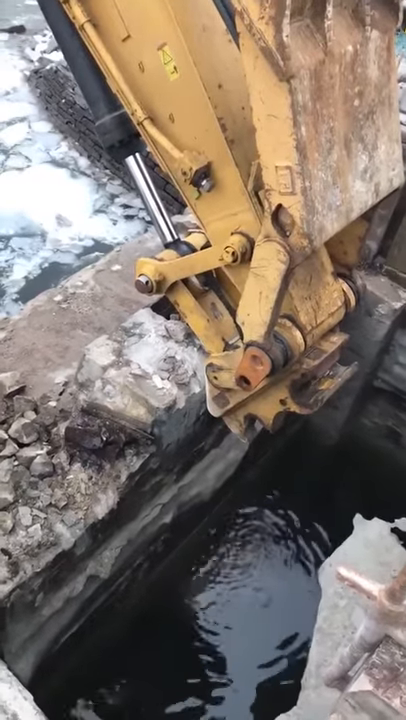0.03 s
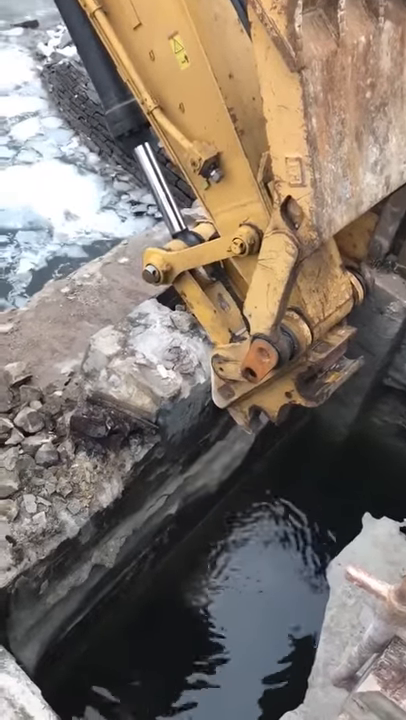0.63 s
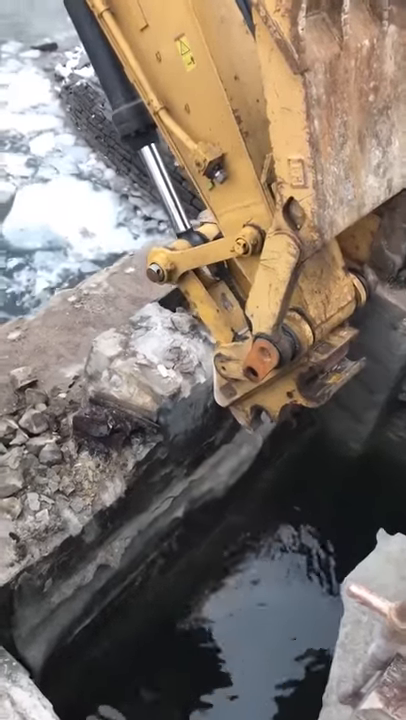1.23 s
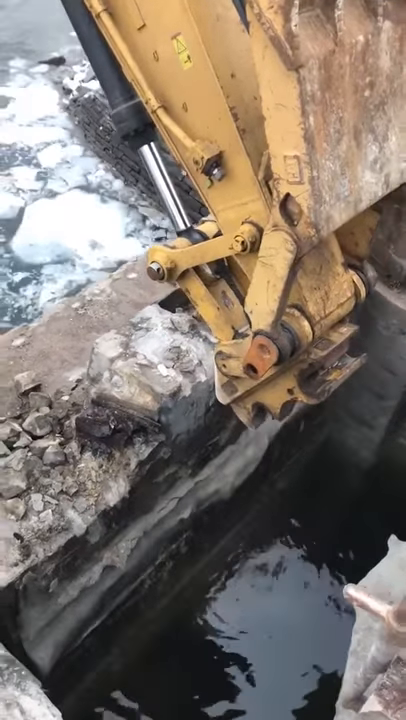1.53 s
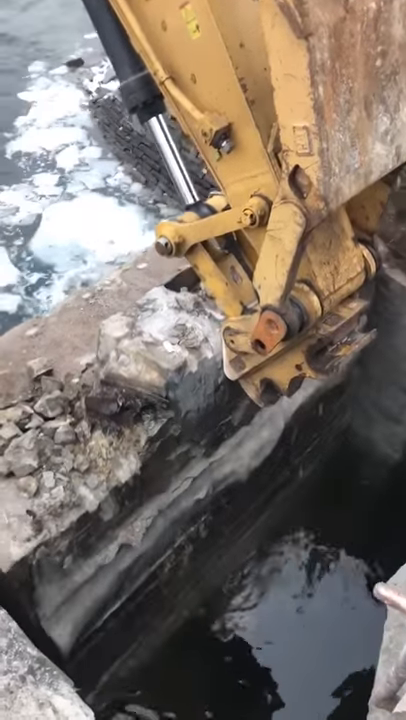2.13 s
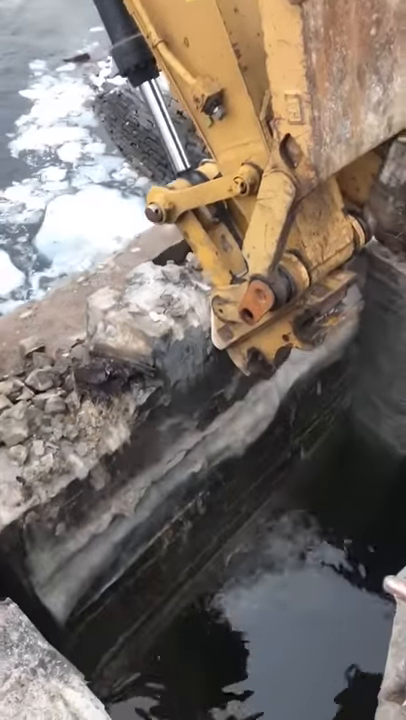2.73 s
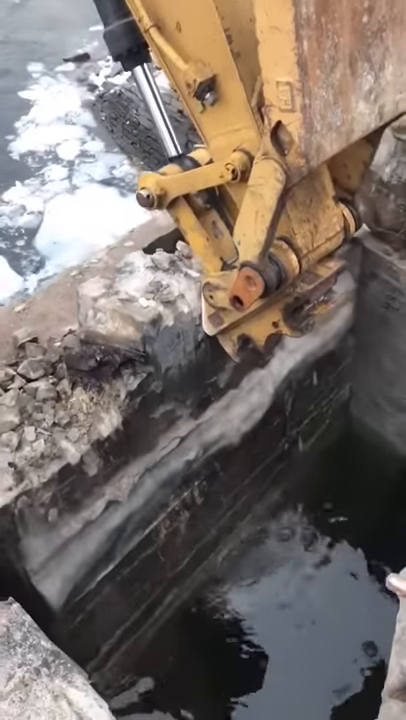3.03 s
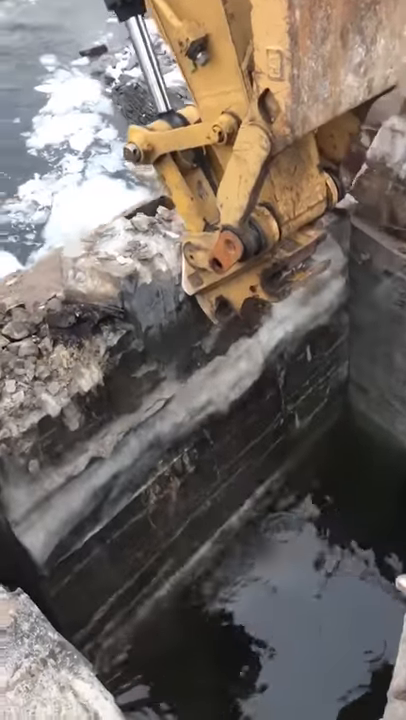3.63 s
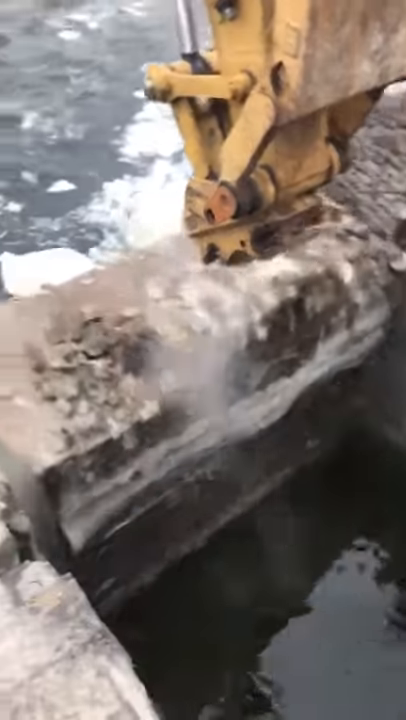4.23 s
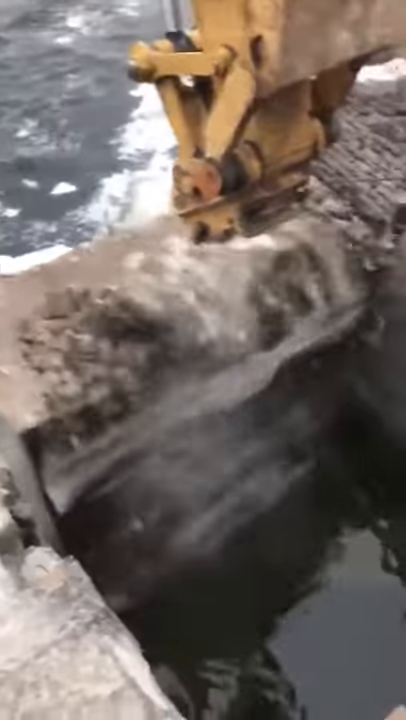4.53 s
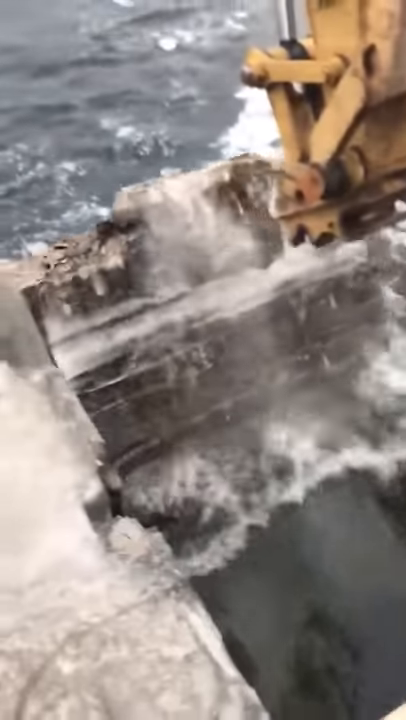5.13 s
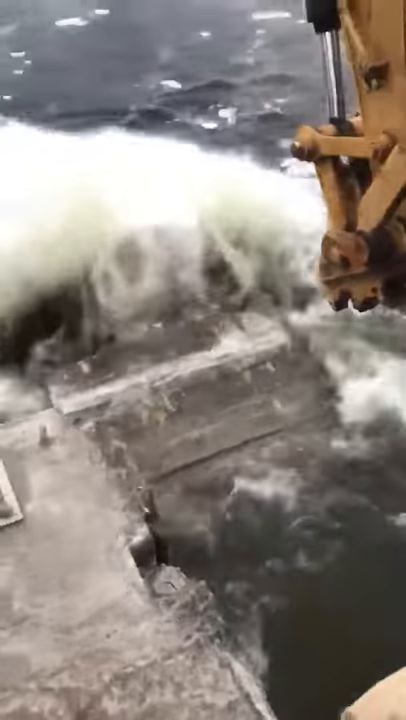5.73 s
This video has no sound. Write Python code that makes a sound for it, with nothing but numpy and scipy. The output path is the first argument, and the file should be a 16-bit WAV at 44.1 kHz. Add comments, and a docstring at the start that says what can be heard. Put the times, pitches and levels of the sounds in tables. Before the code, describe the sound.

Wind buffets a small outdoor microphone throughout, with low rumbling, ragged flutter and irregular thumps. Under it an excavator's diesel drones steadily, with a thin hydraulic whine that swells and fades. A faint snap and trickle of grit come at about 1.5 seconds. At 2.5 seconds concrete breaks with a sharp cluster of cracks, briefly ringing the steel bucket teeth. A small snap and scrape follow at 3.6 seconds, then more cracks around 3.9 and 4.1. From 3.8 to 4.9 seconds the slab crunches and grinds in short bursts, shedding grit and rubble, and the bucket gives two brief groans near 4.5 and 4.8. From 5 seconds the slab drops into water: moderate splashing, hissing spray and bubbling churn build toward the end, near 6 seconds, as the gusts rise again. The cracks and splashes have a short echo off concrete walls.

```python
"""An excavator levers a concrete wall over on a windy waterfront. Brittle fractures snap and ring the
steel bucket teeth, grit trickles out, the slab grinds on its footing, and stick-slip friction makes the
bucket groan. The slab drops and water rushes up around it with spray and ringing bubbles.
The diesel's periodic firing drones under the whine of the hydraulic pump, and all the while
turbulent gusts buffet the small microphone."""
import sys
import numpy as np
from scipy import signal
from scipy.fft import rfft, irfft, next_fast_len
from scipy.io import wavfile
from scipy.ndimage import uniform_filter1d

SR = 44100
rng = np.random.default_rng(int(sys.argv[2]) if len(sys.argv) > 2 else 0)


def transcribe(u):
    """Save the signal u as a 16-bit wav file named by the first command-line argument.

    u: samples, shape (n,) or (channels, n), limited to [-1, 1]; the rate is SR.
    q: integer samples, one column per channel.
    """
    v = np.clip(np.atleast_2d(u).T, -1, 1)
    q = np.round(v * 32767).astype(np.int16)
    wavfile.write(sys.argv[1], SR, q)


N = 263277
TIME = np.arange(N) / SR

# Levels in the tables are relative: each source applies its own gain.
# The breeze between gusts. Each row: time in seconds, rumble level in dB, flutter level in dB.
BREEZE = [(0, -18.5, -24), (.68, -19.5, -25.5), (1.3, -21, -22), (2.3, -21.5, -29), (2.48, -19.5, -21),
          (3.1, -18.5, -35), (4.3, -26.5, -29), (4.97, -29.5, -44), (5.56, -26, -37.5), (5.75, -17, -19),
          (5.97, -18.5, -21)]
# Gusts. Each row: start in seconds, length in seconds, rumble level in dB, flutter level in dB.
GUSTS = [(0.01, 0.17, -19, -25), (0.286, 0.021, -15, -21), (0.487, 0.064, -17, -19),
         (0.955, 0.063, -21.5, -18), (1.097, 0.034, -15, -17), (1.211, 0.058, -25.5, -16),
         (1.65, 0.26, -19, -18.5), (1.93, 0.17, -36, -18.5), (2.17, 0.043, -19, -40),
         (2.664, 0.066, -16, -22), (2.797, 0.056, -14.5, -20.5), (2.966, 0.066, -13.5, -15),
         (3.202, 0.086, -16.5, -21.5), (3.366, 0.31, -17.5, -13), (3.788, 0.1, -22, -15.5),
         (4.095, 0.041, -15, -20.5), (4.218, 0.04, -19, -39), (4.422, 0.095, -13.5, -27),
         (4.583, 0.13, -20, -42), (5.097, 0.1, -20.5, -35), (5.214, 0.11, -18, -21),
         (5.698, 0.13, -23.5, -19.5), (5.887, 0.072, -16, -13.5)]
# The strongest eddies at the microphone port. Each row: start in seconds, swing level in dB,
# pitch in Hz, duration in cycles, flutter level in dB, flutter rise time in seconds.
STRONG_EDDIES = [(0.302, 3, 151, 8, -13, 0.004), (0.999, -6, 194, 6.5, -10, .01),
                 (1.048, 10, 200, 6.1, -24, 0.0041), (1.095, -1, 171, 8.4, -10, .005),
                 (1.183, 8.5, 103, 5.4, -24, 0.0067), (1.194, 1, 131, 3.9, -13, .004),
                 (1.211, -8, 200, 4.4, -10, .004), (1.235, -8, 240, 5.9, -13.5, 0.0083),
                 (1.357, 2.5, 149, 4.1, -16, 0.0048), (1.476, 3, 142, 4.8, -24, 0.0055),
                 (1.528, 13.5, 72, 4.7, -14, .005), (1.566, 2, 170, 4.7, -11, .009),
                 (1.583, 5.5, 111, 6.9, -15.5, 0.0051), (1.617, -13, 91, 6.4, -16.5, .004),
                 (1.734, 1.5, 141, 8, -15, 0.013), (1.773, 6, 220, 8.5, -15.5, 0.0065),
                 (1.961, 0.5, 178, 8.6, -18, 0.0048), (2.002, -7, 122, 6, -11.5, .008),
                 (2.054, 1, 95, 10, -11.5, 0.0086), (2.079, -7, 147, 6.7, -12.5, .007),
                 (2.147, 3, 81, 10, -13.5, 0.0037), (2.172, 5.5, 121, 7.3, -16, 0.0054),
                 (2.314, 1.5, 110, 5, -25, .006), (2.637, 0, 129, 6.7, -5.5, 0.0066),
                 (2.653, 5, 85, 7.1, -8.5, .006), (2.689, 4, 69, 6.6, -13, 0.0044),
                 (2.699, 7.5, 112, 8.2, -24, .006), (2.768, 5, 249, 8.1, -15.5, .005),
                 (2.778, 8, 191, 4.8, -9, .006), (2.794, 3, 120, 6.2, -21, .006),
                 (2.883, -1.5, 200, 6, -11, .007), (2.892, 8.5, 104, 5.9, -18, 0.0056),
                 (2.914, -3, 132, 5.2, -7.5, .006), (2.927, 8, 82, 5, -7.5, 0.0024),
                 (2.958, 8, 69.4, 5.5, -16, .006), (2.984, 2, 202, 8, -11, 0.0087),
                 (3.0, 4, 203, 7.6, -7.5, 0.004), (3.147, 2.5, 185, 10, -23, 0.0066),
                 (3.172, 4.5, 75, 4.5, -38, .006), (3.256, 1, 150, 5.6, -10.5, 0.0074),
                 (3.358, -12, 113, 6, -10.5, 0.0024), (3.413, -3, 162, 6.3, -12, 0.004),
                 (3.437, 0, 150, 5.6, -26, .005), (3.458, 3.5, 79.3, 9.5, -16, 0.0033),
                 (3.558, 8, 155, 5.2, -10, 0.0068), (3.581, 4.5, 170, 4.2, -11, 0.0063),
                 (3.707, -3, 147.7, 9.6, -15.5, 0.0052), (3.798, 4.5, 105, 8.8, -16, 0.0027),
                 (3.838, -2, 67, 5, -12.5, 0.0088), (3.856, 3.5, 110, 4.5, -17, 0.01),
                 (4.07, -2, 110, 5.4, -16, .003), (4.092, 7.5, 81, 7, -14.5, 0.0057),
                 (4.243, 3, 109, 6.7, -24, .006), (4.422, -1, 121, 6, -7, 0.0082),
                 (4.46, 8, 123, 11, -12, .005), (4.487, 7, 115, 7, -15, 0.0058),
                 (4.598, 6.5, 85, 8.1, -12, 0.0053), (4.687, -8, 129.8, 6.1, -17, .005),
                 (4.844, 3, 69, 5.6, -32, 0.0069), (5.034, 5, 70, 2.7, -26, .006),
                 (5.145, 3, 64.4, 9.6, -21, 0.0069), (5.214, 1.5, 90, 5.6, -17, 0.0036),
                 (5.253, 14.5, 68.7, 4, -10, 0.0037), (5.289, 7.5, 90, 6, -10, 0.0056),
                 (5.343, 4.5, 64.7, 5.5, -34, .006), (5.686, -3, 152, 6.5, -10.5, 0.0051),
                 (5.746, -19, 112.7, 5, -10, .005), (5.811, 0, 70, 5.5, -11, 0.0055),
                 (5.88, 2, 268, 9, -14, 0.0035), (5.935, -9, 200, 8.2, -11, 0.0079)]
# The diesel. Each row: time in seconds, firing rate in Hz, level in dB.
ENGINE_RUN = [(0, 89, -26.5), (1.2, 79.4, -27), (2.3, 87, -25), (2.95, 79, -26.5), (3.1, 81, -30),
              (3.45, 81, -27.5), (3.72, 80, -32), (4.25, 87, -25), (4.7, 79, -28.5), (5.97, 140, -36)]
# Engine harmonics. Each row: multiple of the firing rate, level in dB.
ENGINE_ORDERS = [(1, 0), (2, -10.5), (3, -17.5), (4, -11), (15, -29), (28, -24)]
# The hydraulic pump as its load comes and goes. Each row: time in seconds, level in dB, pitch in Hz.
PUMP_WHINE = [(0, -38.5, 540), (.55, -38, 537), (.9, -29.5, 538), (1.3, -36, 541), (1.65, -39, 540),
              (2.0, -32, 540), (2.2, -36, 535), (2.5, -30.5, 538), (3.1, -39, 536), (4.0, -41, 544),
              (4.2, -33, 550), (4.6, -48, 545), (5.97, -50, 540)]
# The bucket skidding off the slab. Each row: start in seconds, length in seconds, level in dB,
# initial slip rate in Hz, fractional unevenness of that rate.
SKIDS = [(4.542, 0.063, -24.5, 415, 0.1365), (4.801, 0.14, -27.5, 388, 0.0352)]
# The slab crushing its footing. Each row: start in seconds, length in seconds, level in dB, cutoff in Hz.
CRUNCHES = [(3.768, 0.062, -26, 2420), (3.825, 0.093, -26.5, 2780), (4.07, 0.08, -27, 5500),
            (4.133, 0.046, -31, 3470), (4.267, 0.039, -28.5, 2500), (4.345, 0.14, -25, 1730),
            (4.421, 0.03, -26.5, 3160), (4.501, 0.083, -27, 4540), (4.818, 0.058, -28.5, 2500)]
# Concrete snapping against the teeth. Each row: start in seconds, level in dB,
# share from 0 to 1 that rings the steel, pitch of the flying shard in Hz.
CRACKS = [(1.495, -19.5, 0.35, 8700), (2.42, -20, 0.3, 8600), (2.438, -16.5, 0.4, 8500),
          (2.4928, 1, 0.22, 5950), (2.497, -7.5, 0.26, 6800), (2.5023, -2, 0.25, 8200),
          (2.515, -13, 0.5, 6600), (3.573, -15, 0.2, 7300), (3.855, -14, 0.5, 8300),
          (3.8606, -9.5, 0.07, 6250), (3.866, -9, 0.33, 4180), (4.0018, -19, 0.13, 6120),
          (4.075, -13, 0.36, 6200), (4.2708, -24, 0.4, 5850)]

# Noisy events. Each row: start in seconds, length in seconds, level in dB.
SPLASHES = [(5.09, 0.15, -30.5), (5.188, 0.044, -34.5), (5.408, 0.0098, -43), (5.592, 0.72, -37),
            (5.853, .12, -39)]   # the plunge, its spout, a slap, the returning wave, its breaking crest
SPRAY_SHEETS = [(5.42, 0.0079, -32), (5.813, 0.048, -34)]   # fine spray off the slap and the crest
GRIT_SPILLS = [(1.39, .105, -39), (2.394, 0.1, -41.5), (3.863, 0.17, -38), (4.078, 0.033, -41),
               (4.496, 0.027, -31), (4.626, .01, -41)]   # grit trickling out of the break
TOOTH_RASPS = [(3.574, 0.041, -31)]   # a tooth dragged over concrete
RUBBLE_BURSTS = [(4.083, 0.051, -22.5), (4.503, 0.04, -31)]   # a lump bursting into rubble

# Normal modes of the steel. Each row: frequency in Hz, level in dB, 60 dB decay time in seconds.
SHELL_MODES = [(727, -4, 0.045), (890, -1.5, 0.028), (1007, 5, 0.031), (1130, 0, 0.04), (1230, 1, 0.035),
               (1555, -10.5, .03), (1900, -10.5, 0.028), (2270, -14, .025)]
TOOTH_MODES = [(937, -13, .16), (1650, -14, 0.07), (2240, -15, 0.05), (2330, -15, 0.16), (2848, -12, .16),
               (3050, -14, .07), (3133, -10, 0.17), (3650, -15, 0.05), (4404, -21, .07), (5803, -6, .06),
               (6092, -6, 0.1), (6510, -8, .09), (6605, -4, 0.12), (6682, -5, 0.09), (6804, -7, .09),
               (7949, -13, .1), (8325, -3, 0.13), (8373, -5, 0.1)]

# Noise spectra. Each row: frequency in Hz, spectral density in dB.
RUMBLE_SPECTRUM = [(20, -31), (32, -17), (50, 2.5), (85, -2), (140, -4), (220, -7.5), (400, -15.5),
                   (900, -49)]   # slow turbulence
FLUTTER_SPECTRUM = [(80, -12.5), (160, -10), (290, -1), (450, -4.5), (650, -8.5), (1000, -13),
                    (1400, -20.5), (1900, -30), (3000, -50), (6000, -65)]   # fast turbulence
SPLASH_SPECTRUM = [(150, 2), (400, -6), (800, 1.5), (1450, 2.5), (2000, -4.5), (2600, -5.5), (4000, -7),
                   (5000, -11), (6400, -11), (9000, -12.5)]   # hissing spray
SPATTER_SPECTRUM = [(500, -15), (1400, 3), (2600, 0), (3800, -8.5), (5000, -6.5), (9000, -17)]   # gobs of water landing
MIST_SPECTRUM = [(1500, -16), (2800, 3), (4000, 0), (5600, 1), (7000, -17), (9000, -2)]   # fine droplets
ROAR_SPECTRUM = [(40, -5.5), (90, -6), (250, 0.5), (500, -9), (800, -11), (1400, -12.5), (1950, -21),
                 (2550, -21.5), (3300, -25), (4200, -26.5), (5000, -31), (6400, -30.5), (7700, -36.5),
                 (9000, -35.5)]   # combustion clatter and cooling fan
GRIT_SPECTRUM = [(1200, -18), (2500, 0.5), (4000, 7.5), (5000, 3), (6400, 6), (9000, 1.5)]   # sand and chips
CRUSH_SPECTRUM = [(200, -20), (400, 2.5), (700, 6), (1100, 4.5), (1600, 0.5), (2200, -5.5), (3200, -10.5),
                  (6000, -19.5), (9000, -28)]   # the crushed footing
RASP_SPECTRUM = [(2000, -5), (3800, -3), (5500, -5), (6500, -1), (7300, 5), (7900, -8), (9000, 3)]   # steel on concrete
RUBBLE_SPECTRUM = [(300, 1), (800, -4.5), (1450, 9), (2200, -2), (2850, 2), (3600, -4.5), (4400, 2.5),
                   (5200, -12), (6200, -3), (7300, -12), (8400, -9), (9000, -11)]   # a bursting lump
SNAP_SPECTRUM = [(500, 0.5), (1200, 2.5), (1800, 2), (2200, 7.5), (2600, 2), (3100, 2), (4400, 1.5),
                 (5500, 0), (6400, 3.5), (7400, 0), (8300, 4), (9000, -3.5)]   # a single fracture


def from_db(db):
    """Amplitude ratio of a level in decibels."""
    return 10 ** (np.asarray(db) / 20)


def rms_one(x):
    """Normalisation to rms 1."""
    return x / np.sqrt(np.mean(x ** 2) + 1e-20)


def evened(x, seconds):
    """Division by the running rms removes slow swings of level."""
    return x / np.sqrt(uniform_filter1d(x ** 2, max(int(seconds * SR), 2)) + 1e-9)


def in_time(rows):
    """Linear interpolation of each column of a time curve to every sample."""
    times, *columns = np.transpose(rows)
    return [np.interp(TIME, times, column) for column in columns]


def swell(start, length, attack_s, release_s):
    """Envelope with a linear rise to 1 at start, a hold and an exponential decay."""
    rise = np.clip(1 + (TIME - start) / attack_s, 0, 1)
    return rise * np.exp(-np.clip((TIME - start - length) / release_s, 0, 20))


def puff(start, rise_s):
    """Critically damped envelope that peaks at 1 after rise_s."""
    out, span = np.zeros(N), slice(int(start * SR) + 1, int((start + 20 * rise_s) * SR))
    age = (TIME[span] - start) / rise_s
    out[span] = age * np.exp(1 - age)
    return out


def stroke(start, length):
    """Contact pressure of one short rub: a quick rise and a slower release."""
    return np.sin(np.pi * np.clip((TIME - start) / length, 0, 1) ** 0.52)


def drift(rate_hz):
    """Low-pass Gaussian noise: a smooth random motion of rms 1."""
    hz = np.arange(N // 2 + 1) * SR / N
    return rms_one(irfft(rfft(rng.standard_normal(N)) / (1 + (hz / rate_hz) ** 2) * (hz > 0), N))


def grains(per_s, spread_db):
    """Poisson process of clicks with random size and sign; rms 1."""
    sizes = from_db(spread_db * np.minimum(rng.exponential(1, N), 4)) * rng.choice([-1, 1], N)
    return rms_one(sizes * (rng.random(N) < per_s / SR))


def colour(x, spectrum):
    """Minimum-phase filter with the given spectrum and unit power gain."""
    size = next_fast_len(N + SR // 2, real=True) // 2 * 2
    hz = np.maximum(np.arange(size // 2 + 1) * SR / size, 1)
    knots_hz, db = np.transpose(spectrum)
    octaves_outside = np.abs(np.log2(hz / np.clip(hz, knots_hz[0], knots_hz[-1])))
    gain_db = np.interp(np.log(hz), np.log(knots_hz), db) - 20 * np.minimum(octaves_outside, 2)
    cepstrum = irfft(np.log(rms_one(from_db(gain_db))))[:size // 2]
    return irfft(rfft(x, size) * np.exp(2 * rfft(cepstrum, size) - cepstrum[0]))[:N]


def ring(clicks, hz, t60):
    """Damped resonator: a unit click excites a decaying sine of amplitude 1."""
    radius, angle = from_db(-60 / (t60 * SR)), 2 * np.pi * hz / SR
    return signal.lfilter([0, np.sin(angle)], [1, -2 * radius * np.cos(angle), radius ** 2], clicks + 1e-18)


def damped_sine(start, hz, cycles):
    """Free vibration that decays by 60 dB in the given number of cycles."""
    out, span = np.zeros(N), slice(int(start * SR) + 1, int((start + cycles / hz) * SR))
    turns = (TIME[span] - start) * hz
    out[span] = np.sin(2 * np.pi * turns) * np.exp(-np.log(1000) * turns / cycles)
    return out


def airflow(attack_s=0.084, release_s=0.031, buffet_db=1.16, buffet_hz=24):
    """Rumble and flutter gains: gusts and breeze add in power and throb together."""
    rumble_power, flutter_power = from_db(in_time(BREEZE)) ** 2
    for start, length, rumble_db, flutter_db in GUSTS:
        gust = swell(start, length, attack_s, release_s)
        rumble_power += (from_db(rumble_db) * gust) ** 2
        flutter_power += (from_db(flutter_db) * gust) ** 2
    throb = evened(from_db(buffet_db * drift(buffet_hz)), 0.089)
    return np.sqrt([rumble_power, flutter_power]) * throb


def small_eddies(rumble_gain, flutter_gain, per_s=16, hz=150, cycles=7, rise_s=0.0047):
    """Random eddies scale with the flow that carries them; rows as in STRONG_EDDIES."""
    rows = []
    for slot, (jitter, octave) in enumerate(rng.random((100, 2))):
        start = (slot + jitter) / per_s
        if start < TIME[-1]:
            swing_db = 20 * np.log10(rumble_gain[int(start * SR)]) + 5
            flutter_db = 20 * np.log10(flutter_gain[int(start * SR)]) - 2.5
            rows.append((start, swing_db, hz * 2 ** (octave - .5), cycles, flutter_db, rise_s))
    return rows


def eddy_swing(start, hz, cycles, rise_share=0.098, lead_cycles=0.84, settle_cycles=0.31):
    """Pressure oscillation of a passing eddy: it swells, slows to its pitch and dies."""
    out, span = np.zeros(N), slice(int(start * SR) + 1, int((start + 1.5 * cycles / hz) * SR))
    turns = (TIME[span] - start) * hz
    age = turns / (rise_share * cycles)
    lead = lead_cycles * (1 - np.exp(-turns / settle_cycles))
    out[span] = age * np.exp(1 - age) * np.sin(2 * np.pi * (turns + lead))
    return out


def wind(pop_hz=750, dull_hz=480, lull_db=-1.5, lull_s=0.029):
    """Turbulent pressure on the microphone port: slow rumble, ragged flutter and single eddies."""
    rumble_gain, flutter_gain = airflow()
    rumble = evened(colour(rng.standard_normal(N), RUMBLE_SPECTRUM), 0.048) * rumble_gain * from_db(0.4)
    lumpy_noise = rng.standard_normal(N) * from_db(2.5 * drift(150))
    flutter = evened(colour(lumpy_noise, FLUTTER_SPECTRUM), 0.035)
    bunches = evened(from_db(drift(80)), 0.085)
    power = (flutter_gain * from_db(-1.5)) ** 2
    swings, stalled = np.zeros((2, N))
    eddies = STRONG_EDDIES + small_eddies(rumble_gain, flutter_gain)
    for start, swing_db, hz, cycles, flutter_db, rise_s in eddies:
        # the flow stalls just ahead of an eddy
        lull_times = [start - 2 * lull_s, start - lull_s / 2, start, start + 0.0028]
        stalled = np.maximum(stalled, np.interp(TIME, lull_times, [0, 1, 1, 0]))
        # it lands with a pop, pushes and pulls the diaphragm, and breaks up into smaller ones
        pop = damped_sine(start, pop_hz * rng.uniform(0.63, 0.89), cycles=10.4)
        swings += from_db(flutter_db + 3.5) * pop
        swings += from_db(swing_db - 11.5) * eddy_swing(start, hz, cycles)
        power += (from_db(flutter_db - 3.5) * puff(start, rise_s)) ** 2
    speed = np.sqrt(power) * from_db(lull_db * stalled)
    dull = signal.sosfiltfilt(signal.butter(2, dull_hz, fs=SR, output="sos"), flutter)
    # faster air sheds finer eddies, in bunches
    brightness = np.minimum(np.sqrt(speed / from_db(-18.5)), 1.4) * bunches
    return rumble + speed * (dull + brightness * (flutter - dull)) + swings


def basin(x, wet_db=-10.5, t60=0.31, first_echo_s=0.012):
    """Reverberation: concrete walls around the water scatter exponentially decaying echoes."""
    age = TIME[:SR // 2]
    echoes = rng.standard_normal(len(age)) * from_db(-60 * age / t60) * (age > first_echo_s)
    return x + from_db(wet_db) * signal.fftconvolve(x, echoes / np.linalg.norm(echoes))[:N]


def mist(attack_per_length=0.78, release_s=0.021):
    """Countless fine droplets sum incoherently to a smooth, bright hiss."""
    sheets = sum(from_db(db) * swell(start, length, attack_per_length * length, release_s)
                 for start, length, db in SPRAY_SHEETS)
    return sheets * colour(rng.standard_normal(N), MIST_SPECTRUM)


def surge(attack_per_length=0.49, release_s=0.079, churn_start_s=5.0, churn_db=-40):
    """Gain of the moving water: splashes and churning add in power; long splashes build slowly."""
    splashes = [from_db(db) * swell(start, length, attack_per_length * length, release_s)
                for start, length, db in SPLASHES]
    churn = from_db(churn_db) * swell(churn_start_s, TIME[-1], attack_s=0.019, release_s=release_s)
    return np.linalg.norm(splashes + [churn], axis=0)


def water(spray_db=4.5, bubbles_db=-2.0, spatter_db=-3.5, bubble_cycles=9.8, splat_s=0.0025):
    """Drop impacts hiss and spatter, and trapped bubbles resonate at pitches set by their size."""
    spray = colour(grains(per_s=12000 * from_db(2 * drift(25)), spread_db=0.0), SPLASH_SPECTRUM)
    births = grains(per_s=430, spread_db=0.5)
    size_class = rng.integers(0, 24, N)
    bubbles = sum(ring(births * (size_class == k), hz, bubble_cycles / hz) * (hz / 1000) ** -.15
                  for k, hz in enumerate(np.geomspace(700, 7500, num=24)))
    # each gob lands on the concrete as a short burst of hiss
    landings = np.abs(grains(per_s=110, spread_db=2.0))
    splats = signal.lfilter([1], [1, -np.exp(-1 / (splat_s * SR))], landings + 1e-18)
    spatter = rms_one(colour(splats * rng.standard_normal(N), SPATTER_SPECTRUM))
    mix = from_db(spray_db) * spray + from_db(bubbles_db) * rms_one(bubbles) + from_db(spatter_db) * spatter
    return surge() * mix


def pump(waver_db=2.5, waver_hz=3.2):
    """The hydraulic pump's tone follows its load and wavers in amplitude and frequency."""
    db, hz = in_time(PUMP_WHINE)
    gain = from_db(db + waver_db * drift(7))
    phase = 2 * np.pi * np.cumsum(hz + waver_hz * drift(15)) / SR
    return gain * np.sqrt(2) * np.sin(phase)


def engine(tones_db=-2.0, throb=0.088):
    """Periodic diesel firing makes harmonics and modulates a broadband roar; the pump whines on top."""
    firing_hz, level_db = in_time(ENGINE_RUN)
    phase = 2 * np.pi * np.cumsum(firing_hz * (1 + .0015 * drift(5))) / SR
    tones = np.zeros(N)
    for order, db in ENGINE_ORDERS:
        gain = from_db(db + 2 * drift(7.2))
        tones += gain * np.sqrt(2) * np.sin(order * phase + rng.uniform(0, 2 * np.pi))
    whine = pump()
    roar = colour(rng.standard_normal(N) * (1 + throb * np.cos(phase)), ROAR_SPECTRUM)
    return from_db(level_db) * (from_db(tones_db) * tones + roar) + whine


def skids(gain_db=1.0, sag_hz_per_s=260):
    """Stick-slip friction: the teeth slip ever more slowly and drive the modes of the bucket shell."""
    out = np.zeros(N)
    for start, length, db, slip_hz, uneven in SKIDS:
        rate = (slip_hz - sag_hz_per_s * np.clip(TIME - start, 0, length)) * (1 + uneven * drift(305))
        slips = np.diff(np.floor(np.cumsum(rate) / SR), prepend=0) * from_db(3 * drift(150))
        groan = sum(from_db(mode_db) * ring(slips, hz, t60) * (-1) ** k
                    for k, (hz, mode_db, t60) in enumerate(SHELL_MODES))
        out += from_db(db + gain_db) * stroke(start, length) * evened(groan - groan.mean(), 0.053)
    return out


def grit(attack_s=0.041, release_s=0.021):
    """Shot noise of sand and chips running out of the opening break."""
    chips = grains(per_s=5000 * from_db(4.3 * drift(19)), spread_db=-3.0)
    flow = sum(from_db(db) * swell(start, length, attack_s, release_s) for start, length, db in GRIT_SPILLS)
    return flow * colour(chips, GRIT_SPECTRUM)


def crumbling(rows, spectrum, per_s, spread_db):
    """Impulses from breaking grains merge into short, dense runs of noise."""
    fractures = evened(colour(grains(per_s, spread_db), spectrum), 0.02)
    return sum(from_db(db) * stroke(start, length) for start, length, db in rows) * fractures


def crunches(gain_db=4.0):
    """Crushing under the tilting slab sets off runs of tiny fractures; buried ones lose their treble."""
    fractures = evened(colour(grains(per_s=650, spread_db=1.5), CRUSH_SPECTRUM), 0.032)
    out = np.zeros(N)
    for start, length, db, cutoff_hz in CRUNCHES:
        muffle = signal.butter(2, cutoff_hz, fs=SR, output="sos")
        out += signal.sosfilt(muffle, from_db(db + gain_db) * stroke(start, length) * fractures + 1e-18)
    return out


def cracks(snap_db=-11.5, snap_s=0.00077, dust_db=-21.0, dust_s=0.01, shard_db=-9.0, steel_db=-14.0):
    """Brittle fracture: a snap, a puff of dust and a clinking shard, with the teeth's modes set ringing."""
    starts, levels_db, steel_share, shard_hz = np.transpose(CRACKS)
    bursts = sum(from_db(db) * (puff(start, snap_s) + from_db(dust_db) * puff(start, dust_s))
                 for start, db in zip(starts, levels_db))
    out = from_db(snap_db) * colour(bursts * rng.standard_normal(N), SNAP_SPECTRUM)
    out += sum(from_db(db + shard_db) * damped_sine(start, hz, cycles=56)
               for start, db, hz in zip(starts, levels_db, shard_hz))
    for hz, mode_db, t60 in TOOTH_MODES:
        strike_db = levels_db + mode_db + steel_db + rng.normal(0, 5.3, len(starts))
        clicks = np.zeros(N)
        clicks[(starts * SR).astype(int)] = steel_share * from_db(strike_db)
        out += ring(clicks, hz, t60)
    return out


def scene():
    """Superposition in mono: concrete, bucket and water reverberate; engine and wind arrive dry."""
    concrete = cracks() + grit() + crunches()
    concrete += crumbling(TOOTH_RASPS, RASP_SPECTRUM, per_s=1000, spread_db=3.5)
    concrete += crumbling(RUBBLE_BURSTS, RUBBLE_SPECTRUM, per_s=3000, spread_db=-0.5)
    return (engine() + basin(concrete + skids() + water() + mist()) + wind())[None]


def record(dry, low_cut_hz=30, ceiling=1.1, high_cut_hz=9000):
    """The microphone is band-limited, and soft saturation rounds the strongest gusts."""
    x = signal.sosfilt(signal.butter(2, low_cut_hz, "high", fs=SR, output="sos"), dry)
    x = x / (1 + (x / ceiling) ** 4) ** (1 / 4)
    return signal.sosfilt(signal.ellip(10, .3, 70, high_cut_hz, fs=SR, output="sos"), x)


dry = scene()
out = record(dry)
transcribe(out)
```